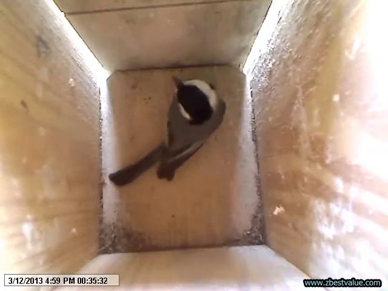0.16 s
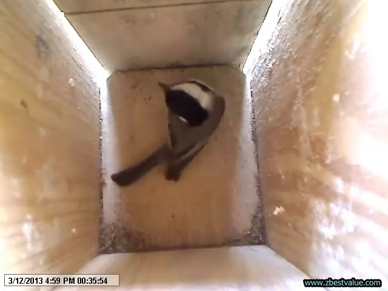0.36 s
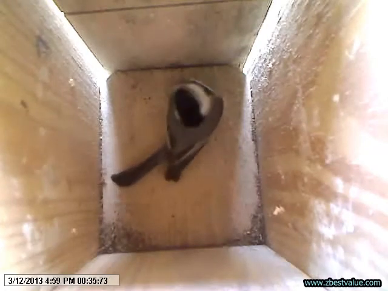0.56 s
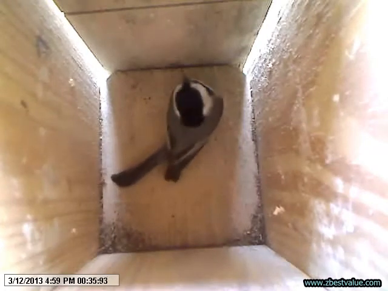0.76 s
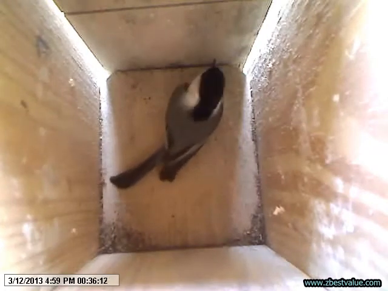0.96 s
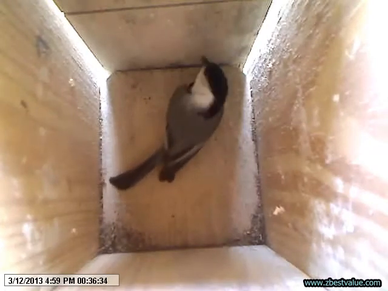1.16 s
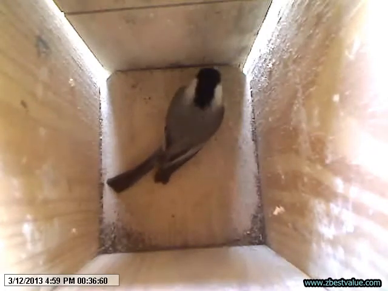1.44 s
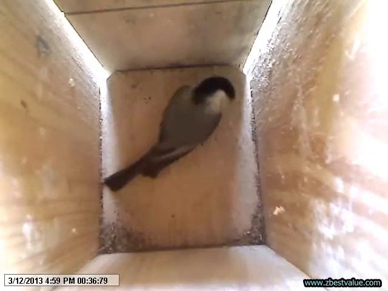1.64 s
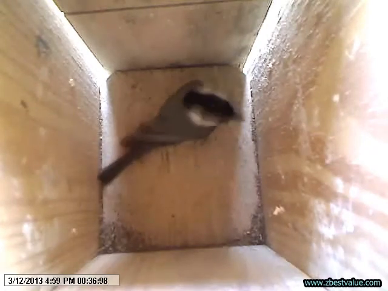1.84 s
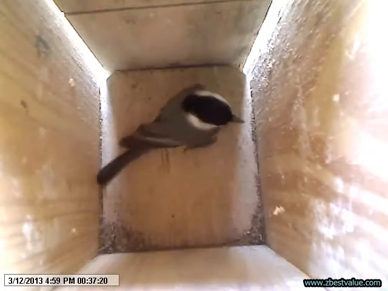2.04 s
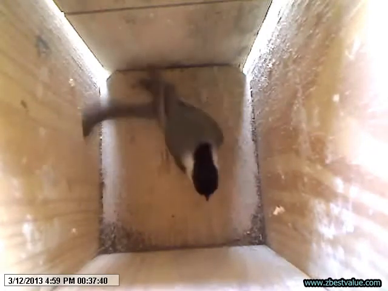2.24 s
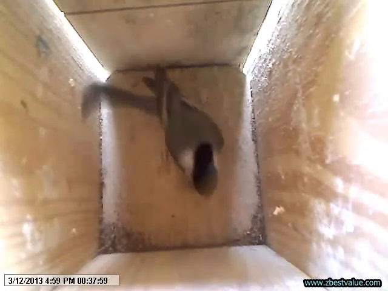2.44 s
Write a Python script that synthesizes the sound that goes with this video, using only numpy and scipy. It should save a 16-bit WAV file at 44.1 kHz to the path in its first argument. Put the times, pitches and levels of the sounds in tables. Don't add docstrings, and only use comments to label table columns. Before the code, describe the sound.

A small bird scuffles on the wooden floor of a nest box. A low, steady distant engine rumble runs throughout, boxy and muffled, with faint whine and hiss. Little moves until a light tap and rustle around 1.0 s; soft steps follow at 1.6 s, a sharp claw tick at 1.9 s, then the busiest scrabble and hardest woody knock near 2.2 s, with rustling and a light step at 2.5 s.

```python
import sys
import numpy as np
from scipy import signal
from scipy.fft import rfft, irfft
from scipy.io import wavfile
from scipy.ndimage import uniform_filter1d

SR = 44100
rng = np.random.default_rng(int(sys.argv[2]) if len(sys.argv) > 2 else 0)


def transcribe(signal):
    frames = np.atleast_2d(signal).T
    limited = np.clip(frames, -1, 1)
    pcm = np.round(limited * 32767).astype(np.int16)
    wavfile.write(sys.argv[1], SR, pcm)


def boost(x):
    u = np.asarray(x, float) / 20
    return 10 ** u


N = 113778

# [t/s, knock level/dB, claw level/dB, claw length/s]
LANDINGS = [(1.002, -42, -60, .01), (1.577, -47, -63.5, 0.0076), (1.7535, -53, -45, .006),
            (1.863, -40, -47, 0.0045), (1.9085, -32, -29, .0035), (1.945, -45, -49.5, 0.0044),
            (2.154, -33, -42.5, 0.011), (2.172, -44.5, -44.5, 0.008), (2.212, -36, -33, .007),
            (2.216, -24.5, -36, .007), (2.2235, -30, -33, .006), (2.384, -46, -76, 0.005),
            (2.529, -36, -56, 0.0092)]
# [f/Hz, level/dB, t60/s]
FLOOR_MODES = [(309.4, -5, .08), (455.5, -4, .05), (545, -6, .04), (634, -8, 0.06), (684, -0.5, 0.062),
               (782, 0, 0.057), (1413, -16, 0.05), (1728, -14.5, .05), (2122, -20, 0.014),
               (2620, -20, 0.066), (2697, -20.5, 0.037), (3330, -23.5, 0.023)]
# [f/Hz, level per Hz/dB]
CLAW_SPECTRUM = [(1200, -16.5), (2600, -7), (3500, -7), (4380, -2), (5000, -3), (6130, 7.5), (7000, -2.5),
                 (7900, -6)]
# [t/s, feather level/dB, claw drag relative to feathers/dB]
MOVEMENT = [(0, -72.5, -9.5), (.86, -80.5, -10), (.91, -62, -7), (1.05, -81.5, -4.5), (1.302, -75.5, -7.5),
            (1.371, -66.5, -7), (1.499, -83.5, -2), (1.718, -69, -5.5), (1.761, -59, -16.5), (1.85, -63, 0),
            (1.94, -65, -7), (2.029, -78.5, -4.5), (2.111, -63.5, -2.5), (2.16, -52, 0), (2.2, -56, -3),
            (2.26, -55, -3), (2.421, -60.5, -10.5), (2.55, -53, -2.5)]
# [f/Hz, level per Hz/dB]
FEATHER_SPECTRUM = [(3000, -29.5), (4500, -14.5), (5650, -9), (6500, 3.5), (7200, 0), (7900, -7.5)]
# [f/Hz, level per Hz/dB]
DRAG_SPECTRUM = [(1000, -23.5), (1800, -10), (2300, -11), (3000, -2), (4300, 0.5), (5200, -6.5),
                 (6200, -24.5)]
# [f/Hz, width/Hz, gain/dB]
BOX_RESONANCES = [(323, 65, 12.5), (773.4, 44, 17), (911.3, 150, 7), (1289, 59, -10), (1698, 99, 9.5),
                  (2166, 160, -1), (2653, 76, -12), (2850, 250, 4), (3180, 150, -16.5), (3610, 100, -11.5),
                  (4074, 140, -12), (4584, 100, -6), (5730, 220, -20), (7030, 140, 3)]
# [f/Hz, level per Hz/dB]
RUMBLE_SPECTRUM = [(20, 6.5), (100, -5), (250, -6.5), (450, -21), (1000, -30.5), (2000, -36.5),
                   (4000, -40.5), (7500, -49.5)]
# [multiple of the firing rate, level/dB]
ENGINE_ORDERS = [(3, -13.5), (4, -1), (5, 2.5), (6, -12.5), (7, -6.5), (9, -15), (10, -14), (10.7, -9.5),
                 (13, -24), (14, -25), (16, -12), (19, -3), (20, -13), (24, -11.5)]
# [f/Hz, level/dB, 6 dB under the sine's peak]
WHINE_TONES = [(1241, -73), (2480, -78.5), (3721, -87.5)]
# [f/Hz, level/dB]
LEAST_STEP = [(100, -80), (2500, -80), (6800, -74), (7200, -64), (7900, -56)]
# [start t/s, end t/s]
ATTACKS = [
    (.997, 1.02),
    (1.56, 1.59),
    (1.902, 1.925),
    (2.15, 2.175),
    (2.205, 2.245),
]

KNOCK_LAG_S, KNOCK_SOFT_HZ = 0.001, 2390
RUB_DB, RUB_GRAINS_PER_S, RUB_GRAIN_DB, RUB_SMOOTH = 4, 3000, 1, 0.41
RUMBLE_DB, RUMBLE_PATCHY_DB = -36.5, 0.4
FIRING_HZ, ENGINE_DB, ENGINE_WOBBLE, ENGINE_FLICKER_DB = 15.07, -36.5, 0.00394, 1.5
STEP_DB, SHARED_STEP_DB, STEP_SCATTER_DB, DEAD_ZONE = 3.5, -2.5, 3, 0.2
CAMERA_SR, CAMERA_TOP_HZ, SHORT_STEP_DB = 16000, 7840, -3
OFFSET, HISS_DB, HISS_FOLLOWS_DB = -0.0069, -94, -26


def rms_one(x):
    return x / np.sqrt(np.mean(x ** 2) + 1e-20)


def at_hz(points, hz):
    points = np.array(points)
    return np.interp(np.log(hz), np.log(points[:, 0]), points[:, 1])


def drift(rate):
    r = np.exp(-80 * np.pi * rate / SR)
    noise = rng.standard_normal(N // 40 + 2002)
    slow = signal.lfilter([1], [1, -2 * r, r * r], noise)[2000:]
    return np.interp(np.arange(N) / 40, np.arange(len(slow)), rms_one(slow))


def colour(x, spectrum):
    hz = np.maximum(np.arange(N // 2 + 1) * SR / N, 1)
    gain = boost(at_hz(spectrum, hz)) * (hz > spectrum[0][0] / 2)
    return rms_one(irfft(rfft(x) * gain, N))


def ring(clicks, hz, t60):
    r = 1000 ** (-1 / (t60 * SR))
    w = 2 * np.pi * hz / SR
    return signal.lfilter([0, np.sin(w)], [1, -2 * r * np.cos(w), r * r], clicks + 1e-18)


def claw_scratches():
    t, envelope = np.arange(N) / SR, np.zeros(N)
    for start, _, claw_db, length in LANDINGS:
        age = np.maximum(t - start, 0) / length
        envelope += boost(claw_db) * (t > start) * np.minimum(age * 6, 1) * np.exp(-age)
    return envelope * colour(rng.standard_normal(N), CLAW_SPECTRUM)


def floor_knocks():
    landings, knock = np.array(LANDINGS), np.zeros(N)
    spread_db = rng.normal(0, 1.7, (len(LANDINGS), len(FLOOR_MODES)))
    at = ((landings[:, 0] + KNOCK_LAG_S) * SR).astype(int)
    for k, (hz, db, t60) in enumerate(FLOOR_MODES):
        clicks = np.zeros(N)
        clicks[at] = boost(landings[:, 1] + db + spread_db[:, k])
        knock += ring(clicks, hz, t60) * (-1) ** k
    soft = np.exp(-2 * np.pi * KNOCK_SOFT_HZ / SR)
    return signal.lfilter([1 - soft], [1, -soft], knock)


def grains():
    sizes_db = RUB_GRAIN_DB * np.minimum(rng.exponential(1, N), 5)
    sizes = boost(sizes_db) * rng.choice([-1, 1], N)
    clicks = sizes * (rng.random(N) < RUB_GRAINS_PER_S / SR)
    return rms_one(clicks) + RUB_SMOOTH * rng.standard_normal(N)


def rubbing():
    t = np.arange(N) / SR
    at, busy, drag = np.transpose(MOVEMENT)
    busy_db, drag_db = np.interp(t, at, busy), np.interp(t, at, drag)
    feathers = boost(2.0 * drift(50)) * colour(grains(), FEATHER_SPECTRUM)
    claws = boost(drag_db + 2.3 * drift(40)) * colour(grains(), DRAG_SPECTRUM)
    return boost(busy_db + RUB_DB) * (feathers + claws)


def boxed(x):
    for hz, width_hz, db in BOX_RESONANCES:
        r = np.exp(-np.pi * width_hz / SR)
        w = 2 * np.pi * hz / SR
        band = np.array([1, 0, -1]) * (1 - r * r) / 2
        x = x + (boost(db) - 1) * signal.lfilter(band, [1, -2 * r * np.cos(w), r * r], x)
    return x


def rumble():
    return boost(RUMBLE_DB + RUMBLE_PATCHY_DB * drift(6)) * colour(rng.standard_normal(N), RUMBLE_SPECTRUM)


def engine():
    turns = np.cumsum(FIRING_HZ * (1 + ENGINE_WOBBLE * drift(0.92))) / SR
    drone = np.zeros(N)
    for order, db in ENGINE_ORDERS:
        level = boost(db + ENGINE_FLICKER_DB * drift(2.46))
        drone += level * np.sin(2 * np.pi * (order * turns + rng.random()))
    return boost(ENGINE_DB) * drone


def whine():
    t = np.arange(N) / SR
    return sum(boost(db + 6) * np.sin(2 * np.pi * hz * t) for hz, db in WHINE_TONES)


def scene():
    bird_steps = floor_knocks() + claw_scratches()
    return (bird_steps + boxed(rubbing() + rumble()) + engine() + whine())[None]


def camera_channel(x, size, band, extra_db):
    count = round(N * CAMERA_SR / SR)
    low = np.pad(signal.resample(x, count), (size, 2 * size - count % size))
    n, k = np.arange(2 * size), np.arange(size) + 0.5
    window = np.sin(np.pi * (n + 0.5) / (2 * size))[:, None]
    basis = np.sqrt(2 / size) * window * np.cos(np.pi / size * np.outer(n + 0.5 + size / 2, k))
    frames = np.lib.stride_tricks.sliding_window_view(low, 2 * size)[::size]
    line_hz = k * CAMERA_SR / 2 / size
    lines = (frames @ basis * (line_hz < CAMERA_TOP_HZ)).reshape(len(frames), -1, band)
    level = np.sqrt(np.mean(lines ** 2, axis=2))
    spread = np.exp(uniform_filter1d(np.log(level + 1e-4), size=11, axis=1))
    hz = (np.arange(size // band) + 0.5) * band * CAMERA_SR / 2 / size
    treble = np.sqrt(np.mean(level[:, hz > 2000] ** 2, axis=1, keepdims=True))
    masked = boost(STEP_DB) * spread + boost(SHARED_STEP_DB) * treble
    masked = np.minimum(hz / 2000, 1) ** 2 * boost(extra_db) * masked
    scatter = boost(STEP_SCATTER_DB * rng.standard_normal(level.shape))
    step = ((masked + boost(at_hz(LEAST_STEP, hz))) * scatter)[..., None]
    lines = np.sign(lines) * np.floor(np.abs(lines) / step + 0.5 - DEAD_ZONE) * step
    back, out = lines.reshape(len(frames), size) @ basis.T, np.zeros(len(low))
    out[:-size] += back[:, :size].ravel()
    out[size:] += back[:, size:].ravel()
    return signal.resample(out[size:size + count], N)


def faint_hiss(x):
    hz = np.arange(N // 2 + 1) * SR / N
    bright = np.sqrt(uniform_filter1d(np.diff(x, 2, prepend=[0, 0]) ** 2, size=400) + 1e-16)
    hiss = (boost(HISS_DB) + boost(HISS_FOLLOWS_DB) * bright) * rng.standard_normal(N)
    return irfft(rfft(hiss) * ((hz < 9650) | (hz > 14500)), N)


def top_cut(x):
    return signal.sosfilt(signal.butter(12, 15720, fs=SR, output="sos"), x)


def record(dry):
    t = np.arange(N) / SR
    short = uniform_filter1d(sum((t > a) * (t < b) * 1.0 for a, b in ATTACKS), size=200)
    x = camera_channel((1 - short) * dry[0], size=768, band=12, extra_db=0)
    x = x + camera_channel(short * dry[0], size=64, band=2, extra_db=SHORT_STEP_DB)
    mix = (x + OFFSET + faint_hiss(x))[None]
    return top_cut(mix)


dry = scene()
out = record(dry)
transcribe(out)
```